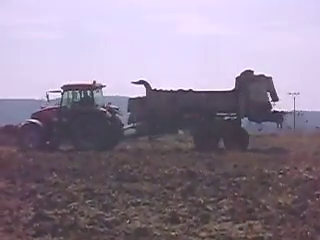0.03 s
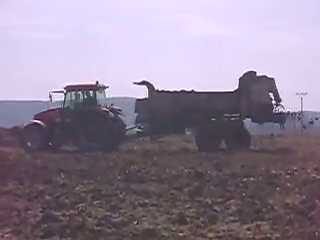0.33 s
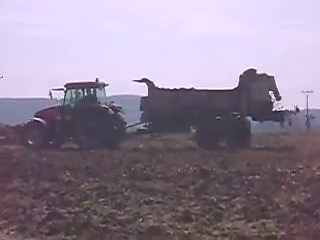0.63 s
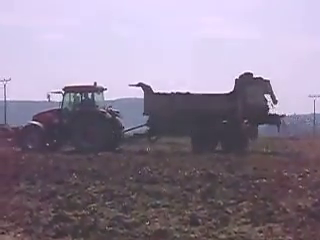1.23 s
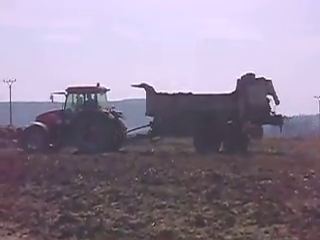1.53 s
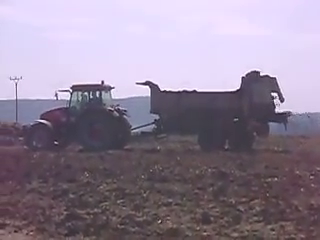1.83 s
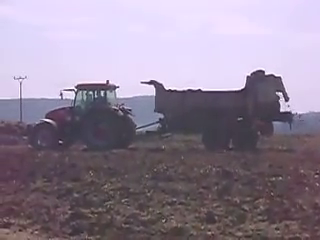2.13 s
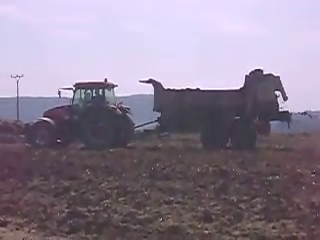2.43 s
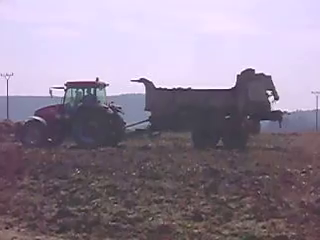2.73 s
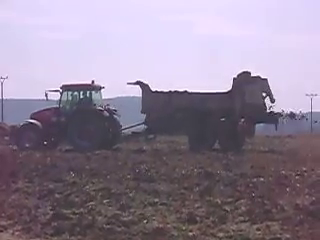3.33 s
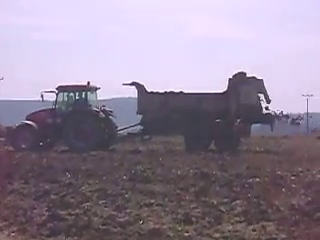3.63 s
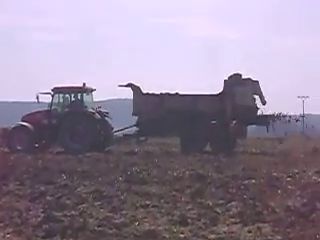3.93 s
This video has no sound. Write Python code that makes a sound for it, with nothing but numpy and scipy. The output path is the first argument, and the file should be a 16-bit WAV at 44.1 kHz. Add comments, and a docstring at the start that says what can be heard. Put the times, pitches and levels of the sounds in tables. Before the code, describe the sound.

A diesel tractor drones and clatters throughout, some way off in a field. Its manure spreader hums and rumbles, with a hissing patter of muck and scattered knocks, the strongest at 2.4 seconds. From about 1.8 seconds rubbing steel squeals in short fits. At 3.3 seconds the engine pitch sags and one hard, loud clack right beside the microphone overloads it. A small close tick follows at 3.7 seconds.

```python
"""A diesel drone comes first: a tractor some way off, pulling a working manure spreader over a field.
The spreader's shaft hums, its steel body rumbles, muck patters out and the machine knocks now and then.
From about halfway, rubbing steel squeals in fits, and near the end the engine sags.
One hard clack right beside the microphone overloads it; a small close tick follows."""
import sys
import numpy as np
from scipy import signal
from scipy.fft import rfft, irfft
from scipy.io import wavfile
from scipy.ndimage import uniform_filter1d

SR = 44100
rng = np.random.default_rng(int(sys.argv[2]) if len(sys.argv) > 2 else 0)


def output_pcm(signal):
    """Save a mono or channel-first signal as 16-bit PCM at the path in sys.argv[1].

    Samples are clipped to [-1, 1] before scaling.
    """
    pcm = np.clip(np.atleast_2d(signal).T, -1, 1) * 32767
    wavfile.write(sys.argv[1], SR, np.round(pcm).astype(np.int16))


N = 176400


def undb(db):
    """Decibels to gain."""
    return 10 ** (np.asarray(db) / 20)


def unit(x):
    """Scale to a standard deviation of 1."""
    return x / (x.std() + 1e-12)


def curve(table, column=1):
    """One column of a timed table at every sample."""
    rows = np.array(table)
    return np.interp(np.arange(N) / SR, rows[:, 0], rows[:, column])


def wander(per_s):
    """Smooth random drift with a spread of 1."""
    hold = max(int(SR / per_s), 2)
    steps = rng.standard_normal(2048)[np.arange(N) // hold % 2048]
    return unit(uniform_filter1d(uniform_filter1d(steps, hold), hold))


def colour(x, spectrum, size=4096):
    """Causal filter through (f/Hz, level/dB) points that keeps the power of white noise."""
    hz, db = np.array(spectrum).T
    bins_hz = np.maximum(np.arange(size // 2 + 1) * SR / size, 1)
    gain = undb(np.interp(np.log(bins_hz), np.log(hz), db))
    cepstrum = irfft(np.log(gain))
    response = irfft(np.exp(rfft(2 * cepstrum[:size // 2], size)))  # minimum phase
    return signal.oaconvolve(x, response / np.linalg.norm(response))[:N]


def ring(x, modes):
    """Drive decaying modes with x."""
    t = np.arange(SR // 4) / SR
    response = sum(undb(db - 60 * t / t60) * np.sin(2 * np.pi * hz * t) for hz, t60, db in modes)
    return signal.fftconvolve(x, response)[:N]


def tones(cycles, multiples, flutter_db, flutter_per_s, wobble_rad):
    """Multiples of a running cycle count, each wavering in level and phase."""
    out = 0
    for multiple, db in multiples:
        angle = 2 * np.pi * (round(multiple) * cycles + rng.random())
        angle += wobble_rad * wander(flutter_per_s)
        out += np.sqrt(2) * undb(db + flutter_db * wander(flutter_per_s)) * np.sin(angle)
    return out


def bursts(blows):
    """A brief crunch of contact noise for each blow."""
    t = np.arange(N) / SR
    envelope = sum(undb(db) * (t >= at) * np.exp(-np.maximum(t - at, 0) / decay)
                   for at, db, decay in blows)
    return envelope * rng.standard_normal(N)


ENGINE_RUN = [(0, 72.35, -0.5), (.5, 72.2, 0), (.78, 73.72, 1), (1.2, 74.64, -1.5), (2.2, 74.17, -1),
              (2.6, 73.76, 1), (2.85, 74.45, 0.5), (3.1, 74.54, 4), (3.25, 73.62, -3), (3.38, 66.8, -4),
              (3.8, 66, 0), (4, 66, 1)]  # engine's course: t/s, firing f/Hz, exhaust gain/dB
EXHAUST_TONES = [(1, -39.5), (2, -36), (3, -46.5), (4, -49.5), (5, -50.5)]  # drone: multiple of the firing rate, level/dB
CLATTER_SPECTRUM = [(250, -19.5), (430, -3), (560, 0.25), (680, -1.5), (790, 2), (900, -1.5), (1120, 0.6),
                    (1300, -5), (1480, -6), (1600, -10), (1950, -13), (2300, -22.5), (5000, -36)]  # engine and chains: f/Hz, relative level/dB
CLATTER_ENVELOPE = [(0, -33), (.3, -32.5), (.8, -32), (1.4, -33), (2.3, -32.5), (3, -34), (4, -34.5)]  # clatter at the microphone: t/s, level/dB

def tractor():
    """Out in the field, the exhaust drones and metallic clatter pulses with the firings."""
    firings = np.cumsum(curve(ENGINE_RUN)) / SR
    drone = tones(firings, EXHAUST_TONES, flutter_db=1.5, flutter_per_s=7, wobble_rad=.15)
    pulsing = (1 + .15 * np.cos(2 * np.pi * firings)) * undb(.92 * wander(35))
    clatter = unit(colour(pulsing * rng.standard_normal(N), CLATTER_SPECTRUM))
    return drone * undb(curve(ENGINE_RUN, column=2)) + clatter * undb(curve(CLATTER_ENVELOPE))


SHAFT_RUN = [(0, 10.9, 0.5), (.2, 11.3, 0.5), (.55, 11.4, 2.5), (.88, 12, 1.5), (1.15, 11.1, -7),
             (1.45, 10.9, -3.5), (1.9, 11.3, 0.5), (2.2, 11.36, 0), (3, 11.33, -0.5), (3.4, 11.15, -1),
             (4, 11.17, 0)]  # spreader drive: t/s, turning f/Hz, hum gain/dB
GEAR_TONES = [(4, -47.5), (9, -45.5), (12, -41.5), (16, -40.5), (18, -48), (23, -46.5), (24, -47),
              (29, -42.5), (31, -50.5), (33, -45.5)]  # gears and beaters: multiple of the shaft rate, level/dB
RUMBLE_SPECTRUM = [(20, -7.5), (45, -10), (75, -4), (125, 0), (165, -3), (270, -3), (370, -7), (430, -17),
                   (700, -35)]  # steel body: f/Hz, relative level/dB
RUMBLE_ENVELOPE = [(0, -31), (.35, -28), (.52, -30), (.7, -26.5), (.85, -31.5), (1.45, -31), (2.1, -31),
                   (2.9, -33), (3.6, -30.5), (4, -31.5)]  # rumble at the microphone: t/s, level/dB

def spreader():
    """Behind the tractor, gears hum and the steel body shakes with each turn of the shaft."""
    turns = np.cumsum(curve(SHAFT_RUN)) / SR
    hum = tones(turns, GEAR_TONES, flutter_db=2, flutter_per_s=6, wobble_rad=.27)
    shaking = (1 + .15 * np.cos(2 * np.pi * turns)) * undb(.9 * wander(18))
    body = colour(shaking * rng.standard_normal(N), RUMBLE_SPECTRUM)
    rumble = unit(signal.sosfilt(signal.butter(2, 900, fs=SR, output="sos"), body))
    return hum * undb(curve(SHAFT_RUN, column=2)) + rumble * undb(curve(RUMBLE_ENVELOPE))


PATTER_SPECTRUM = [(1000, -8), (1950, -0.5), (2350, -2.5), (2750, 1.5), (2930, -2), (3100, 4), (3380, 2),
                   (3750, -3), (4030, -0.5), (4250, -3), (4650, -0.5), (5200, -3.5), (5550, -11.5),
                   (6200, -27)]  # flung muck: f/Hz, relative level/dB
PATTER_ENVELOPE = [(0, -39.8), (.15, -39.5), (.9, -42.5), (1.4, -42.5), (2.2, -41.7), (2.8, -40.7),
                   (3.3, -38.5), (3.7, -40.5), (4, -39.5)]  # patter at the microphone: t/s, level/dB

def muck(impacts_per_s=2000, scatter_db=4):
    """Dense small impacts of muck on the beaters, a hissing patter from across the field."""
    sizes = undb(scatter_db * rng.uniform(-1, 1, N)) * rng.standard_normal(N)
    impacts = (rng.random(N) < impacts_per_s / SR) * sizes
    spray = (unit(impacts) + .94 * rng.standard_normal(N)) * undb(.8 * wander(35))
    return unit(colour(spray, PATTER_SPECTRUM)) * undb(curve(PATTER_ENVELOPE))


KNOCK_BLOWS = [(.095, -34, .015), (.33, -33.5, 0.013), (1.047, -33, .008), (1.815, -30.5, .01),
               (2.374, -23.5, .01), (3.11, -31, 0.0077)]  # blows on the spreader: t/s, level/dB, decay/s
KNOCK_SPECTRUM = [(300, -6.5), (1000, 2), (1600, -4.5), (2080, 2.5), (2350, -7), (2900, 1), (3800, -8),
                  (5000, -7), (5600, -16), (6200, -29.5)]  # their contact noise: f/Hz, relative level/dB

def knocks():
    """A few harder blows on the spreader carry over to the microphone."""
    return colour(bursts(KNOCK_BLOWS), KNOCK_SPECTRUM)


STEEL_PARTIALS = [(966, 0), (1003, -2), (1088, -6)]  # rubbing steel: f/Hz, relative level/dB
SQUEAL_SWELLS = [(1.76, .1, -39), (2.0, .06, -34), (2.13, .06, -37), (2.26, .07, -36), (2.36, .04, -31),
                 (2.49, 0.08, -36.5), (2.76, .09, -33.5), (2.95, .16, -38.5), (3.24, .12, -40.5),
                 (3.72, .25, -43)]  # fits of squealing: middle t/s, length/s, level/dB

def squeal():
    """Off on the spreader, steel rubs on steel in short, rough swells."""
    t = np.arange(N) / SR
    swells = sum(undb(db) * np.exp(-2 * ((t - at) / length) ** 2) for at, length, db in SQUEAL_SWELLS)
    return swells * unit(tones(t, STEEL_PARTIALS, flutter_db=3, flutter_per_s=45, wobble_rad=.7))


CLACK_BLOWS = [(3.335, -12, .002), (3.3397, 3, 0.0021), (3.3452, -3.5, 0.0034), (3.3491, -8, .0012)]  # touch, blow and rebounds: t/s, relative level/dB, decay/s
CLACK_SPECTRUM = [(100, -10.5), (270, 0), (700, 1), (1450, 0), (2250, -1), (2800, 0), (3300, -3),
                  (4500, 1.5), (5000, -6.5), (6200, -26)]  # their contact noise: f/Hz, relative level/dB
CLACK_RESONANCES = [(272, 0.052, -18), (466.7, .05, -15), (580, .04, -21), (820, .03, -21.5),
                    (980, 0.042, -12), (1440, .025, -15), (1990, 0.021, -13), (3620, 0.033, -14),
                    (4500, 0.015, -10)]  # struck object's modes: f/Hz, t60/s, relative level/dB

def clack(crunch_db=-2, ring_db=-.5):
    """Right beside the microphone, something hard strikes, rebounds and rings briefly."""
    impulses = np.zeros(N)
    for at, db, _ in CLACK_BLOWS:
        impulses[int(at * SR)] += undb(db)
    crunch = colour(bursts(CLACK_BLOWS), CLACK_SPECTRUM)
    return undb(crunch_db) * crunch + undb(ring_db) * ring(impulses, CLACK_RESONANCES)


TICK_BLOW = [(3.7157, -13.5, .0011)]  # light contact: t/s, level/dB, decay/s
TICK_SPECTRUM = [(400, -3), (1800, -6), (2470, 3), (3000, -6), (3800, -18), (4600, -9), (5400, -11),
                 (6200, -21.5)]  # its noise: f/Hz, relative level/dB

def tick():
    """One small, dry contact close to the microphone."""
    return colour(bursts(TICK_BLOW), TICK_SPECTRUM)


def scene():
    """The far machines and the close contacts, heard in mono from one spot in the open air."""
    far = tractor() + spreader() + squeal() + muck() + knocks()
    close = clack() + tick()
    return (far + close)[None]


def record(dry, microphone_hz=5770, ceiling=.85, knee=7.5, top_hz=15800):
    """A narrow-band microphone whose loudest peaks clip; the distortion is cut off above top_hz."""
    narrow = signal.sosfilt(signal.ellip(8, .3, 80, microphone_hz, fs=SR, output="sos"), dry)
    clipped = narrow / (1 + abs(narrow / ceiling) ** knee) ** (1 / knee)
    return signal.sosfilt(signal.ellip(8, .2, 70, top_hz, fs=SR, output="sos"), clipped)


dry = scene()
out = record(dry)
output_pcm(out)
```